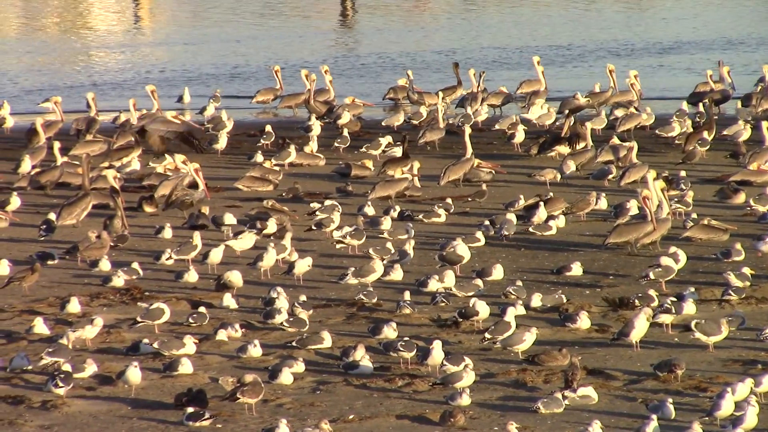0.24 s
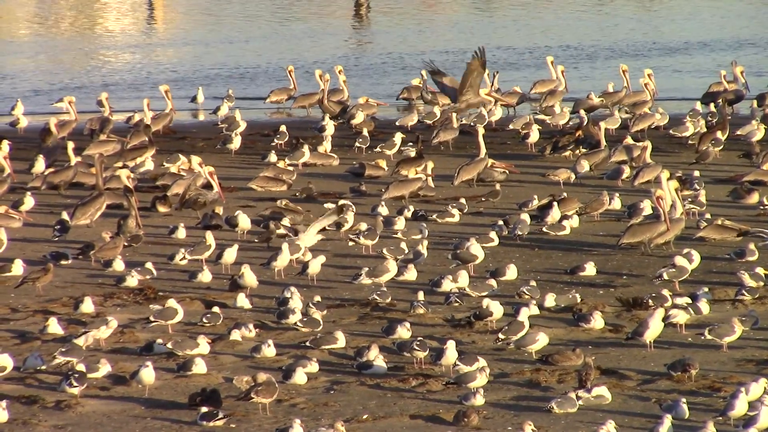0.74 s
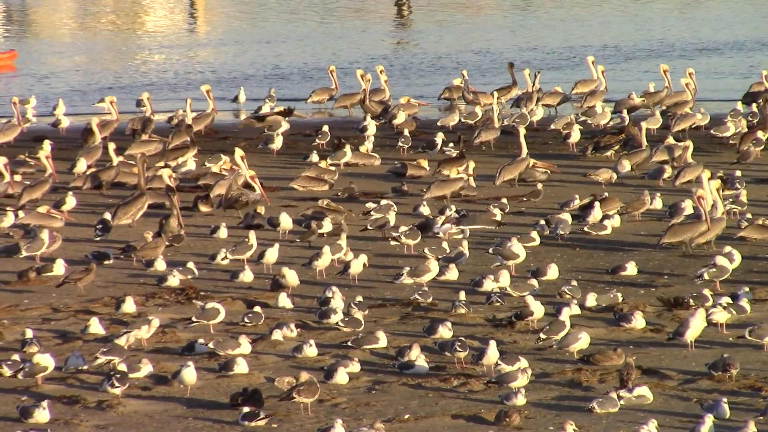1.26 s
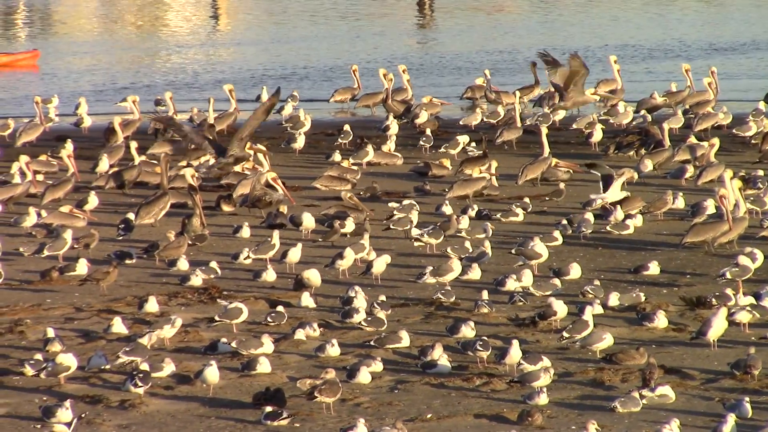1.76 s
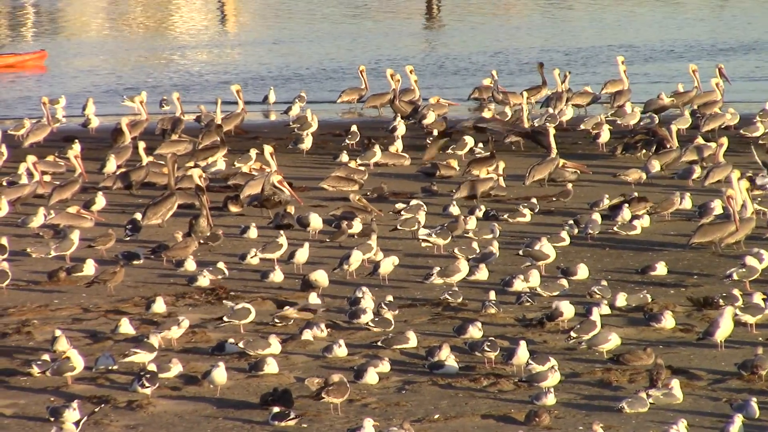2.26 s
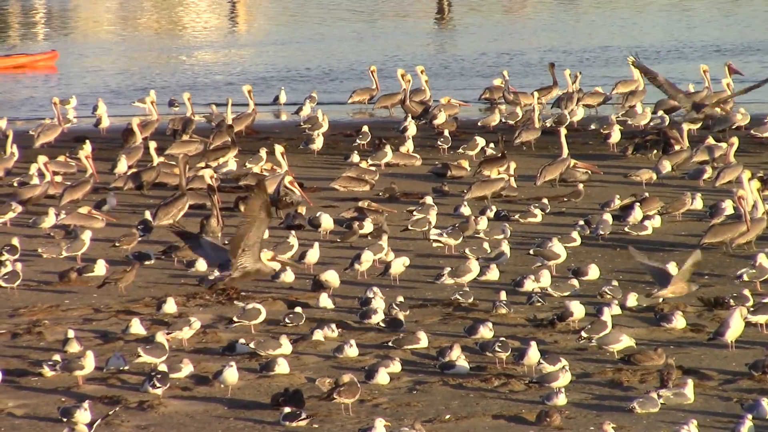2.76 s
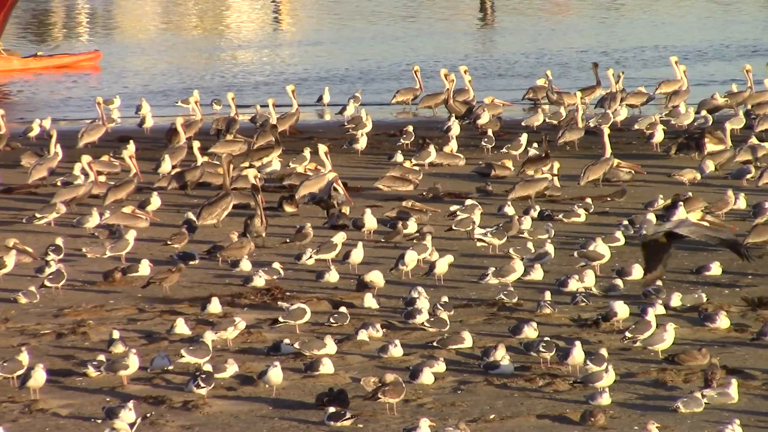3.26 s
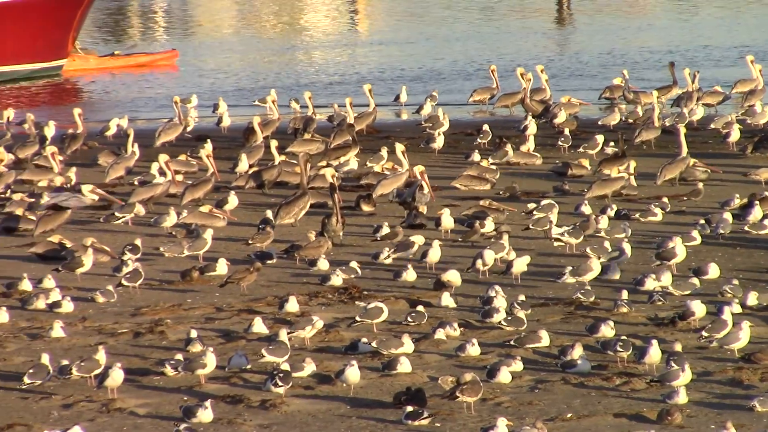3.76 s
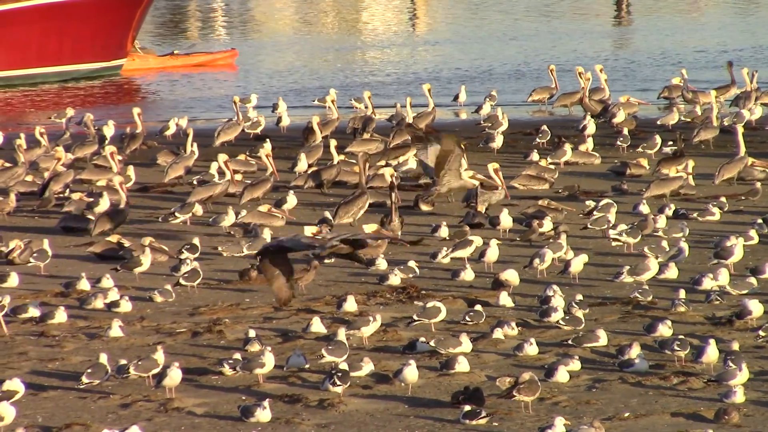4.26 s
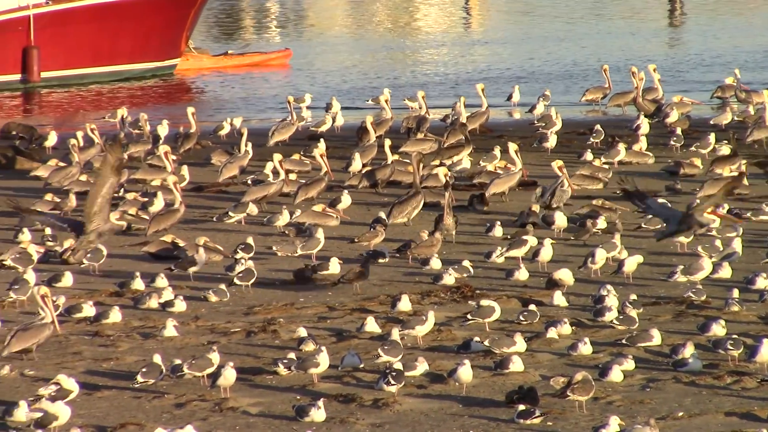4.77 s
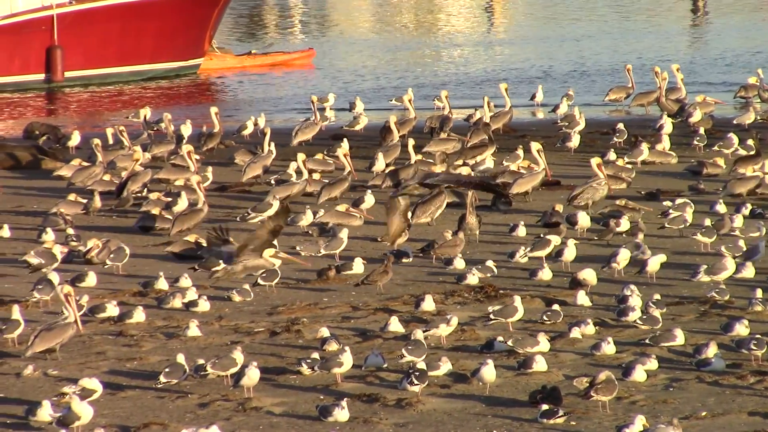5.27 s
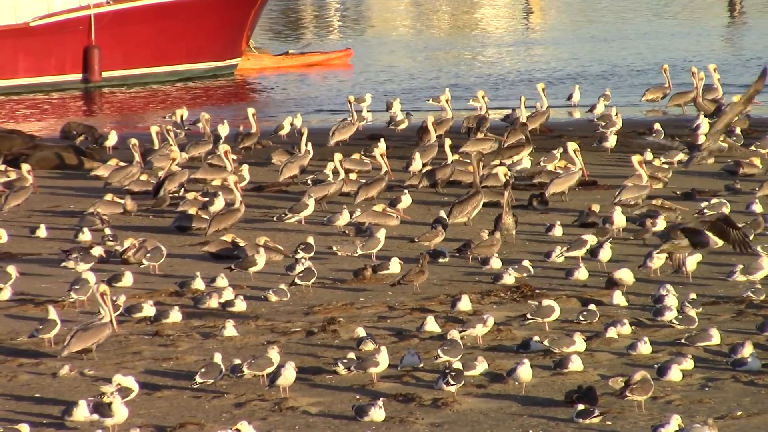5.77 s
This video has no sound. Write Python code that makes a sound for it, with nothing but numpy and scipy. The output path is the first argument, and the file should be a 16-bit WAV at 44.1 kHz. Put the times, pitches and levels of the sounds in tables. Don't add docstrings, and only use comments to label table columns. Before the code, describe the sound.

Outdoor camera sound from a muddy harbour shore. A gull's long call dominates, near the centre: hesitant closed-bill notes first, then a regular string of nasal, ringing yelps that break downward. Behind it lie steady distant traffic, hiss, a weak steady engine tone and scattered far cries and peeps. Low wind buffeting swells in the middle, briefly pushing the level down, then fades, leaving thinner, clearer background.

```python
import sys
import numpy as np
from scipy import signal
from scipy.fft import rfft, irfft, next_fast_len
from scipy.io import wavfile
from scipy.ndimage import uniform_filter1d

SR = 44100
rng = np.random.default_rng(int(sys.argv[2]) if len(sys.argv) > 2 else 0)


def generate_wav(sig):
    pcm = np.round(np.clip(np.atleast_2d(sig).T, -1, 1) * 32767).astype(np.int16)
    wavfile.write(sys.argv[1], SR, pcm)


def volts(x):
    e = np.asarray(x, float) / 20
    return 10 ** e


N = 265437


def evened(x):
    return x / np.sqrt(np.mean(x ** 2) + 1e-20)


def read(points, hz):
    f, value = np.transpose(points)
    return np.interp(np.log(hz + 1), np.log(f + 1), value)


def follow(rows, t):
    s, *columns = np.transpose(rows)
    return [np.interp(t, s, c) for c in columns]


def add(mix, s, sound):
    part = mix[round(s * SR):][:len(sound)]
    part += sound[:len(part)]


def filtered(x, order, edges_hz, kind, run=signal.sosfilt):
    return run(signal.butter(order, edges_hz, kind, fs=SR, output="sos"), x)


def wander(count, span):
    width = max(int(span), 1)
    return evened(uniform_filter1d(uniform_filter1d(rng.standard_normal(count), width), width))


def noise(colour, same, size, patchy_db, flicker_db=0, tilt_db=0, right_db=((1, 0), (2, 0))):
    hop = size // 4
    frames, hz = N // hop + 5, np.fft.rfftfreq(size, 1 / SR)
    a, b, c, d, patches = rng.standard_normal((frames, len(hz), 5)).T
    patches = evened(uniform_filter1d(uniform_filter1d(patches, 8, axis=0), 10, axis=1))
    like = np.clip(read(same, hz), 0, 1)[:, None]
    left = a + 1j * b
    right = volts(read(right_db, hz))[:, None] * (like * left + np.sqrt(1 - like ** 2) * (c + 1j * d))
    field_db = read(colour, hz)[:, None] + patchy_db * patches + flicker_db * wander(frames, 1.7)
    octaves = np.log2(np.clip(hz, 200, 900) / 200)[:, None]
    frame_tilt_db = np.interp(np.arange(frames) * hop, np.arange(N), tilt_db * np.ones(N))
    z = np.array([left, right]) * volts(field_db + octaves * frame_tilt_db)
    norm = np.sqrt(np.sum(volts(2 * read(colour, hz))) * 2 / 3) * 2
    return signal.istft(z, nperseg=size, noverlap=size - hop)[1][:, :N] / norm


# frequency in Hz, density in dB per Hz.
WASH_COLOUR = [(24, -58), (40, -35.5), (189, -3), (270, -11), (306, -10.5), (550, -10.5), (854, -0.5),
               (1500, -10), (2100, -15.5), (2340, -20.5), (2880, -23), (6000, -40), (7800, -42),
               (13200, -120)]
# time in seconds, level in dB.
WASH_LEVEL = [(0.0, -44.5), (0.55, -43), (0.69, -42.5), (1.19, -43), (1.91, -42.5), (2.18, -41),
              (2.65, -40.5), (2.92, -43), (3.22, -48.5), (4.59, -50.5), (4.91, -47.5), (5.28, -48),
              (5.41, -46), (6.02, -47.5)]
# frequency in Hz, likeness 0-1.
WASH_SAME = [(400, 1), (800, 0.99), (3100, 0.92), (6800, 0.76), (15000, 1)]


def traffic_wash(t):
    lift_db = 5.5
    body = noise(WASH_COLOUR, WASH_SAME, size=1024, patchy_db=1.3, flicker_db=.5)
    return volts(follow(WASH_LEVEL, t)[0] + lift_db) * body


# frequency in Hz, density in dB per Hz.
HISS_COLOUR = [(1060, -9.5), (1800, 0), (2890, -8), (4300, -16.5), (5860, -25.5), (8350, -26.5),
               (10400, -31.5), (11400, -39), (11800, -34.5), (15800, -41.5)]
# frequency in Hz, likeness 0-1.
HISS_SAME = [(1000, 1), (3100, 1), (6800, 0.81), (9000, 0.86), (11000, 0.76), (15000, 0.8)]
# time in seconds, lift in dB of the hiss below 5 kHz.
FLOCK_LIFT = [(0, -1), (3.3, -0.81), (3.9, 0.18)]


def hiss_and_flock(t):
    hiss = volts(-48) * noise(HISS_COLOUR, HISS_SAME, size=512, patchy_db=.3, flicker_db=.3)
    flock = filtered(hiss, 2, 5000, "low", signal.sosfiltfilt)
    return hiss + (volts(follow(FLOCK_LIFT, t)[0]) - 1) * flock


# time in seconds, level in dB.
WHINE_LEVEL = [(0.0, -51), (0.36, -55.5), (1.45, -51.5), (2.0, -58), (3.4, -55.5), (4.05, -86),
               (4.25, -57.5), (4.9, -75)]


def engine_whine(t):
    level_db = follow(WHINE_LEVEL, t)[0] + 0.62 * wander(N, 1500)
    tone = volts(level_db) * (t < WHINE_LEVEL[-1][0]) * np.sin(2 * np.pi * 1029 * t)
    return tone * volts([[3.5], [1.5]])


def camera_whistle(t):
    centre_hz, width_hz, level_db = 11070, 130, -80
    grain = rng.standard_normal((2, N)) + 1j * rng.standard_normal((2, N))
    fuzz = signal.lfilter([1], [1, -np.exp(-np.pi * width_hz / SR)], grain)
    fuzz = fuzz + 1.9 * fuzz[::-1].mean(0)
    return volts(level_db) * evened((fuzz * np.exp(2j * np.pi * centre_hz * t)).real)


def harbour():
    t = np.arange(N) / SR
    return traffic_wash(t) + hiss_and_flock(t) + engine_whine(t) + camera_whistle(t)


# start in seconds, hold in seconds, level in dB, brightness in dB per octave.
GUSTS = [(0, 0.094, -39, -4), (0.109, 0.012, -29.5, -1), (.14, 0.045, -37, -6), (0.207, 0.077, -33.5, -2),
         (0.296, 0.094, -35, -5.5), (1.646, 0.092, -38.5, -14), (2.315, 0.14, -27.5, -5),
         (2.499, 0.035, -25, -5), (2.564, 0.066, -24.5, -4.5), (2.669, 0.021, -19.5, -2),
         (2.742, 0.1, -20, -1), (2.884, 0.099, -22.5, 0.5), (3.018, 0.092, -25, -2.5),
         (3.124, 0.11, -27.5, 3.5), (3.239, 0.04, -26.5, 2), (3.29, 0.23, -37.5, 5), (3.587, 0.011, -40, 8),
         (3.67, 0.22, -40.5, 5.5), (4.026, 0.013, -47, 1), (4.137, 0.083, -43, 0.5),
         (4.303, 0.084, -43.5, -6), (4.46, 0.05, -43.5, -4), (4.59, 0.22, -49, 4.5),
         (4.854, 0.018, -39.5, 4.5), (4.9, 0.039, -45, 0), (5.815, 0.016, -37.5, -31),
         (5.963, 0.055, -38, -10)]
# time in seconds, level in dB.
LULL_LEVEL = [(0, -46), (.45, -56), (1.45, -43), (1.6, -43), (2.25, -41), (3.4, -50), (3.95, -67),
              (5.1, -83.5), (6.02, -73)]


def gusting(t):
    rise_db_per_s, fall_db_per_s, lull_bright_db = 445, 403, -2
    start, length, level_db, bright_db = np.transpose(GUSTS)[:, :, None]
    before_s, after_s = np.maximum(start - t, 0), np.maximum(t - start - length, 0)
    gusts = volts(2 * (level_db - rise_db_per_s * before_s - fall_db_per_s * after_s))
    lull = volts(2 * follow(LULL_LEVEL, t)[0])
    power = gusts.sum(0) + lull
    return 10 * np.log10(power), ((gusts * bright_db).sum(0) + lull * lull_bright_db) / power


# time in seconds, peak in dB, ring in Hz.
BUFFETS = [(0.105, -16, 280), (1.679, -25, 145), (2.328, -23, 273), (2.662, -11.5, 199), (2.685, -15, 151),
           (2.724, -16, 242), (2.745, -9, 218), (2.781, -5, 218), (2.813, -10.5, 241), (2.893, -10, 166),
           (2.945, -7.5, 245), (3.135, -12, 262), (3.159, -6.5, 295), (3.18, -12.5, 186), (3.231, -15, 271),
           (3.336, -17.5, 233), (3.402, -26, 314), (3.438, -26, 361), (3.479, -32, 266), (3.518, -24, 320),
           (3.577, -29, 177), (3.675, -23, 320), (3.698, -28, 332), (3.806, -22, 272), (3.85, -21, 494),
           (3.879, -24.5, 231), (4.855, -29, 198), (4.986, -29.5, 336), (5.955, -28.5, 256)]
# time in seconds, peak in dB, ring in Hz.
SLAPS = [(2.749, -24, 600), (3.16, -21.5, 770), (3.177, -20.5, 517), (3.254, -26, 515), (3.339, -23, 380),
         (3.519, -42, 480), (3.706, -29.5, 620), (3.813, -32, 556), (3.851, -36, 700), (4.568, -40, 453),
         (4.867, -34.5, 418), (4.989, -41, 560)]


def eddies():
    thumps = np.zeros(N)
    for s, peak_db, hz in BUFFETS:
        u = np.arange(int(3.0 * SR / hz)) * hz / SR
        swell = np.sin(np.pi * (u / u[-1]) ** 0.81) ** 2
        add(thumps, s, volts(peak_db - 10.0) * np.sin(2 * np.pi * u) * swell)
    for s, peak_db, hz in SLAPS:
        u = np.arange(int(2 * SR / hz)) * hz / SR
        add(thumps, s, volts(peak_db) * np.sin(2 * np.pi * u) * np.sin(np.pi * u / 2) ** 2)
    return np.array([thumps, np.roll(thumps, 12)]) * volts([[-1.6], [1.6]])


# frequency in Hz, density in dB per Hz.
WIND_COLOUR = [(15, -65), (25, -68), (99, -6), (210, -3.5), (383, -12), (465, -15.5), (637, -24.5),
               (835, -22.5), (900, -22.5), (1170, -51), (1980, -120)]
# frequency in Hz, likeness 0-1.
WIND_SAME = [(60, 1), (130, 0.99), (300, 0.96), (640, 0.23), (1000, 0.68)]
# frequency in Hz, level in dB.
WIND_RIGHT = [(60, 0), (200, 0), (380, 4), (700, -3.5)]


def wind():
    frames = np.arange(0, N, 64)
    level_db, bright_db = (np.interp(np.arange(N), frames, c) for c in gusting(frames / SR))
    lumps = evened(volts(2.3 * wander(N, 180)))
    body = noise(WIND_COLOUR, WIND_SAME, size=2048, patchy_db=1.5, tilt_db=bright_db, right_db=WIND_RIGHT)
    apart = np.clip((level_db + 38.0) / 8, .3, 1)
    body = body.mean(0) + apart * (body - body.mean(0))
    return filtered(volts(level_db - 1) * lumps * body + eddies(), 4, 60, "high")


# time in seconds, peak in dB, low edge in Hz, high edge in Hz.
TICKS = [(.124, -61, 6500, 7800), (.291, -58, 6500, 7800), (0.524, -49, 2500, 5470),
         (.658, -58, 7000, 10500), (.727, -60, 6800, 8500), (.754, -53, 4000, 5500),
         (.836, -60, 4200, 5200), (.98, -57, 3900, 5000), (1.121, -59, 6500, 7800),
         (1.193, -58, 5500, 9500), (1.277, -53, 6500, 10500), (1.336, -52, 4000, 5800),
         (1.47, -55, 6000, 11000), (1.712, -57, 6000, 11000), (1.774, -55, 6500, 10000),
         (2.244, -52, 6800, 10000), (2.335, -55, 6800, 10000), (2.841, -50, 6500, 14500),
         (3.718, -58, 6500, 9500), (3.806, -55, 5500, 11000), (3.965, -53, 5000, 9000),
         (4.928, -57, 5960, 12000), (5.721, -57, 4130, 11200)]


def ticks():
    out, t = np.zeros(N), np.arange(400) / SR
    for s, peak_db, low_hz, high_hz in TICKS:
        grit = rng.standard_normal(len(t)) * np.exp(-t / .002)
        snap = filtered(3 * (t == 0) + 0.4 * grit, 2, [low_hz, high_hz], "band")
        add(out, s, volts(peak_db + 4.5) * snap / abs(snap).max())
    return out * volts([[.8], [-.8]])


# frequency in Hz, level in dB.
THROAT = [(3300, -7), (3700, -2), (4050, 1), (4200, -4), (4320, -16), (4430, -8), (4600, -7), (5000, -14)]


def cry(rows, voice, jitter, flutter=(), rough_db=0, gape_db=0, flutter_db=0, shine_db=0):
    t = np.arange(rows[0][0] - .008, rows[-1][0] + .005, 1 / SR)
    hz, level_db = (uniform_filter1d(c, 320, mode="nearest") for c in follow(rows, t))
    peak_db = level_db.max()
    slack = 1 - hz / hz.max()
    wobble = jitter * (1 + 12 * slack) * wander(len(t), 120)
    turns = 2 * np.pi * np.cumsum(hz * (1 + wobble)) / SR
    climb = np.clip((0.47 - np.linspace(0, 1, len(t))) / 0.16, 0, 1)
    climb_db = 0.31 * (peak_db + 29)
    tone = np.zeros(len(t))
    for k, db in flutter:
        db = db - 3 + flutter_db + climb_db + 0.96 * (peak_db - level_db) + 0.75 * wander(len(t), 400)
        tone += np.minimum(1.6 * climb, 1) * volts(db) * np.sin(k * turns)
    for k, db in voice:
        db = db + 0.15 * k * wander(len(t), 500 * k ** .5)
        if k == 1 and flutter:
            db = db - 0.5 * (peak_db + 45.0)
        if k == 2:
            shut = max(voice[0][1] + 10, 0)
            db = db - (24 * (rough_db == 0) + 11 * shut) * slack * (1 - climb) - .55 * shut * climb
        if k == 3:
            db = db + read(THROAT, k * hz) - 4
            db = db - (5 - 0.63 * climb_db) * climb * bool(flutter or rough_db)
            db = db + slack * (1 - climb) * (45 - 130 * slack)
            db = db + gape_db * np.exp(-(slack / .06) ** 2)
        if k == 4:
            db = db + 3 * np.exp(-((k * hz - 5800) / 170) ** 2)
        if k > 4:
            db = db - slack * (70 * climb + 90)
        tone += volts(db + shine_db * (k > 3)) * np.sin(k * turns)
    fade = np.clip(np.minimum((t - t[0]) / .024, (t[-1] - t) / .009), 0, 1)
    rough = (rough_db + 7 * slack) * wander(len(t), 60)
    return t[0], np.sqrt(2) * volts(level_db + rough) * tone * fade


def chirp(start, length, from_hz, to_hz, level_db):
    edge_db = level_db - 9
    middle = (start + length / 2, (from_hz + to_hz) / 2, level_db)
    return [(start, from_hz, edge_db), middle, (start + length, to_hz, edge_db)]


# start in seconds, length in seconds, from Hz, to Hz, level in dB.
WHISTLES = [(1.198, .028, 5050, 5520, -58), (1.27, .06, 5900, 5750, -66), (1.63, .05, 2880, 2860, -58),
            (1.48, .045, 4400, 4500, -55.5), (1.843, .036, 5380, 4960, -59), (1.89, .05, 4880, 4800, -62),
            (1.97, .025, 4820, 4860, -60), (5.44, .045, 3900, 3700, -60), (3.05, .045, 2850, 2600, -56),
            (3.08, .035, 4000, 3580, -60), (4.622, .028, 4150, 3600, -56.5), (2.68, .03, 3850, 3450, -57),
            (5.412, .032, 3680, 3920, -59), (2.535, .022, 2450, 2750, -48), (1.178, .04, 2740, 2760, -57),
            (1.506, .022, 3580, 3820, -58), (5.05, .03, 3850, 3480, -57), (5.064, .022, 4500, 4200, -62),
            (2.778, .028, 4100, 3600, -60), (3.488, .035, 2560, 2460, -56), (1.878, .06, 6350, 6300, -67),
            (1.96, .04, 6350, 6300, -68)]
# time in seconds, pitch in Hz, level in dB.
LONG_WHISTLE = [(1.262, 5100, -62), (1.274, 4760, -56), (1.35, 4610, -55), (1.4, 4380, -59),
                (1.44, 4320, -59.5), (1.466, 4420, -57)]
# multiple of the pitch, level in dB.
PIPE = [(1, 0), (.68, 3)]


def whistles():
    out = np.zeros(N)
    add(out, *cry(chirp(*WHISTLES[0]), PIPE, jitter=0.0035))
    for rows in [LONG_WHISTLE] + [chirp(*row) for row in WHISTLES[1:]]:
        add(out, *cry(rows, PIPE[:1], jitter=0.0016))
    return out


def hoarse(start, length, centre_hz, width_hz, level_db):
    count = int(length * SR)
    edges_hz = [centre_hz - width_hz / 2, centre_hz + width_hz / 2]
    puff = filtered(rng.standard_normal(2 * count), 2, edges_hz, "band")[count:]
    return start, volts(level_db) * evened(puff) * np.sqrt(np.hanning(count))


def answer(start, length, top_s, top_hz, level_db, loudest_at, break_drop):
    bend_per_s2, break_s = 52, .016
    t = np.arange(0, length, .002)
    breaking = np.maximum(1 + (t - length) / break_s, 0)
    hz = top_hz * (1 - bend_per_s2 * (t - top_s) ** 2 - break_drop * breaking ** 2)
    shape_db = np.interp(t / length, [0, loudest_at, 1], [-9, 0, -3.5])
    return np.transpose([start + t, hz, level_db + shape_db])


# start in seconds, length in seconds, top reached after s, top pitch in Hz, level in dB.
ANSWERS = [(.485, .108, .048, 1500, -49.5), (1.172, .028, .059, 1707, -46.5),
           (2.588, .095, .054, 1435, -44.5), (4.208, .086, .037, 1462, -48.5), (4.5, .075, .045, 1549, -52),
           (4.525, .108, .06, 1462, -42), (4.899, .052, .024, 1652, -37.5), (4.995, .067, .012, 1445, -47),
           (5.2, .086, .05, 1655, -42.5), (5.415, .065, .03, 1300, -50), (5.535, .06, .02, 1700, -46),
           (5.87, .052, .016, 1705, -45)]
# multiple of the pitch, level in dB.
FAR_BILL = [(1, -13), (2, -6.5), (3, -28)]
# start in seconds, length in seconds, centre in Hz, width in Hz, level in dB.
HOARSE = [(2.168, .03, 2850, 220, -49), (2.178, .022, 3750, 250, -53), (2.522, .024, 2880, 200, -46.5),
          (2.534, .018, 3720, 250, -54), (4.858, .04, 3200, 300, -58), (4.946, .032, 3200, 320, -55),
          (5.28, .02, 3150, 350, -58), (5.59, .018, 3230, 300, -60), (5.398, .022, 2830, 150, -56),
          (5.744, .022, 2840, 150, -55), (5.874, .012, 3380, 200, -53), (2.18, .018, 2450, 200, -52)]


def answers():
    low, high = np.zeros((2, N))
    for row in ANSWERS:
        if row[3] > 1550:
            add(high, *cry(answer(*row, loudest_at=.86, break_drop=.065), FAR_BILL, jitter=.003, rough_db=2))
        else:
            add(low, *cry(answer(*row, loudest_at=.76, break_drop=.025), FAR_BILL, jitter=.003, rough_db=1.8))
    for row in HOARSE:
        add(high, *hoarse(*row))
    return low, high


def rasp(rows):
    centre_hz, width_hz, under_db, lead_s = 3300, 1500, -20, .016
    count = int(2.4 * lead_s * SR)
    edges_hz = [centre_hz - width_hz / 2, centre_hz + width_hz / 2]
    puff = evened(filtered(rng.standard_normal(count), 4, edges_hz, "band")) * np.hanning(count)
    return rows[0][0] - lead_s, volts(max(row[2] for row in rows) + under_db) * puff


def yelp(start, length, top_hz, level_db, climb=.085, climb_s=.062, lead_s=.0056, swell_s=.02,
         attack_db=-4.5, flare_db=3.5, release_db=-8):
    sag, sag_s, drop, drop_s = .022, .022, .27, .024
    creak_s, creak_sharp = .02, .03
    t = np.arange(-lead_s, length + drop_s, .002)
    rising = np.sin(np.pi / 2 * np.clip(t / climb_s, 0, 1))
    sagging = np.clip((t - length) / sag_s + 1, 0, 1)
    falling = np.maximum(t - length, 0) / drop_s
    creaking = np.maximum(-t, 0) / creak_s
    pitch = 1 - climb * (1 - rising) - sag * sagging ** 2 - drop * falling ** 1.15 + creak_sharp * creaking
    shape_db = np.interp(t, [-creak_s, -.0056, 0, swell_s, length - sag_s, length, length + drop_s],
                         [-20, np.minimum(-15, attack_db), attack_db, 0, 0, flare_db, release_db])
    return np.transpose([start + t, top_hz * pitch, level_db + shape_db])


# start in seconds, length to the break in seconds, top pitch in Hz,
# level in dB, climb as a share of the top.
OPENING = [
    (.335, .105, 1335, -45, .11),
    (.785, .148, 1378, -37.5, .085),
    (1.205, .097, 1408, -42.5, .04),
    (1.528, .084, 1450, -37.5, .055),
]
# multiple of the pitch, level in dB.
CLOSED_BILL = [(1, -1.5), (2, -21), (3, -32), (6, -32)]
PARTING_BILL = [(1, 1), (2, -5), (5, -40), (7, -29), (8, -42)]
LIFTING_BILL = [(1, -6), (2, -1), (3, -3), (4, -36), (5, -27), (6, -45)]


def opening_notes(out):
    for row, bill in zip(OPENING, (CLOSED_BILL, CLOSED_BILL, PARTING_BILL, LIFTING_BILL)):
        rows = yelp(*row, climb_s=0.677 * row[1], swell_s=1.01 * row[1],
                    attack_db=-7.0, flare_db=-1.5, release_db=-10)
        add(out, *cry(rows, bill, jitter=0.005))


# start in seconds, length to the break in seconds, top pitch in Hz, level in dB, climb in seconds.
YELPS = [(1.851, 0.1, 1505, -37.5, 0.08), (2.198, 0.11, 1532, -35, 0.07), (2.555, 0.11, 1518, -38, .072),
         (2.933, 0.095, 1502, -43, 0.065), (3.322, 0.087, 1505, -44.5, 0.063),
         (3.677, 0.09, 1503, -44, 0.057), (4.023, 0.089, 1495, -45.5, 0.051),
         (4.38, 0.085, 1504, -44.5, 0.05), (4.73, 0.092, 1507, -44.5, 0.054),
         (5.078, 0.092, 1511, -43, 0.055), (5.42, 0.097, 1500, -45, 0.059), (5.766, 0.093, 1500, -43, 0.05)]
# lift of the third partial on the flat top in dB, as the bill gapes.
GAPES_DB = [2, 1.5, -6, -2, 0, -1, -1, 0.5, 2, 1, -1, -7]
FLUTTERS_DB = [0, 3, 5, 4, 4, 3, 3, 3, -2, 1, -1, -4]
SHINES_DB = [-4, 1, -2, 1, 1, 4, 2, 2, 4.5, -1.5, -1, -3]
# multiple of the pitch, level in dB.
OPEN_BILL = [(1, -10.5), (2, -1.5), (3, -9.5), (4, -37.5), (5, -37), (6, -41)]
# multiple of the pitch, level in dB.
FLUTTER = [(2.504, -17.5), (1.6, -28)]


def yelps(out):
    for (*row, climb_s), gape_db, flutter_db, shine_db in zip(YELPS, GAPES_DB, FLUTTERS_DB, SHINES_DB):
        rows = yelp(*row, climb_s=climb_s, lead_s=.02)
        add(out, *rasp(rows))
        add(out, *cry(rows, OPEN_BILL, jitter=0.0021, flutter=FLUTTER, gape_db=gape_db,
                      flutter_db=flutter_db, shine_db=shine_db))


def place(x, pan_db, lag_us):
    size = next_fast_len(len(x))
    delay = np.exp(-2j * np.pi * np.fft.rfftfreq(size, 1 / SR) * lag_us * 1e-6)
    late = irfft(rfft(x, size) * delay, size)[:len(x)]
    return np.array([x * volts(pan_db / 2), late * volts(-pan_db / 2)])


def mud_smear(x):
    t = np.arange(SR // 4) / SR
    smear = rng.standard_normal((2, len(t))) * volts(-60 * t / 0.1) * (t > .004)
    return volts(-24) * signal.fftconvolve(x[None], smear / np.linalg.norm(smear[0]), axes=1)[:, :N]


def gulls():
    caller = np.zeros(N)
    opening_notes(caller)
    yelps(caller)
    low, high = answers()
    piper = whistles()
    t = np.arange(N) / SR
    turned = caller * (abs(t - 2.45) < .65)
    placed = place(caller - turned, pan_db=.05, lag_us=0) + place(turned, pan_db=.1, lag_us=8)
    placed += place(low, pan_db=-2.4, lag_us=3) + place(high, pan_db=-.3, lag_us=1)
    placed += place(piper, pan_db=-.9, lag_us=11)
    return placed + mud_smear(caller + low + high + piper)


def scene():
    return harbour() + wind() + ticks() + gulls()


def low_pass(x):
    return signal.sosfilt(signal.butter(12, 15740, fs=SR, output="sos"), x)


# time in seconds, gain in dB.
DUCK = [
    (0, 5),
    (2.84, 4.5),
    (2.85, 1.5),
    (3.3, 1.5),
    (3.4, 5),
    (3.8, 6.5),
]


def record(dry):
    t = np.arange(N) / SR
    mid, side = (dry[0] + dry[1]) / 2, (dry[0] - dry[1]) / 2
    on = np.clip((t - 3.37) / 0.0043, 0, 1)
    cut_mid = filtered(mid, 2, 116, "high")
    cut_side = filtered(side, 4, 2130, "high", signal.sosfiltfilt)
    cut_side += volts(-37) * filtered(mid, 4, 140, "low")
    side = side - 0.32 * filtered(side, 2, 6800, "high", signal.sosfiltfilt)
    mid, side = mid + on * (cut_mid - mid), side + on * (cut_side - side)
    ducked = np.array([mid + side, mid - side]) * volts(follow(DUCK, t)[0])
    return low_pass(ducked)


dry = scene()
out = record(dry)
generate_wav(out)
```